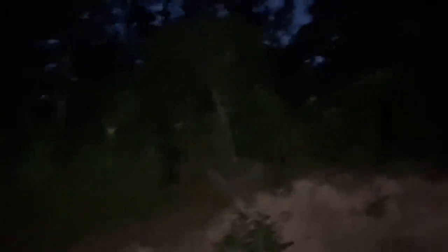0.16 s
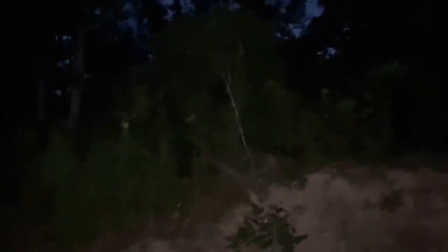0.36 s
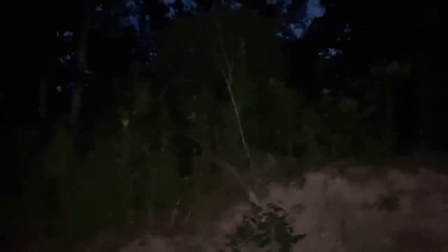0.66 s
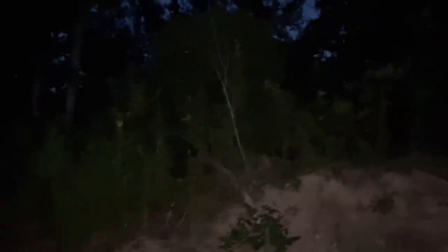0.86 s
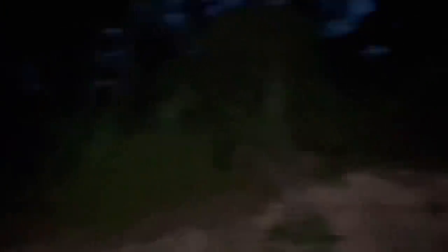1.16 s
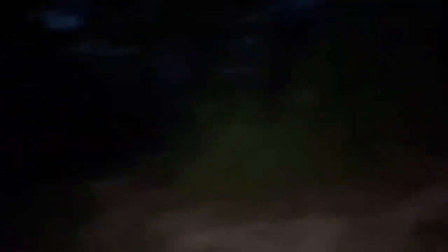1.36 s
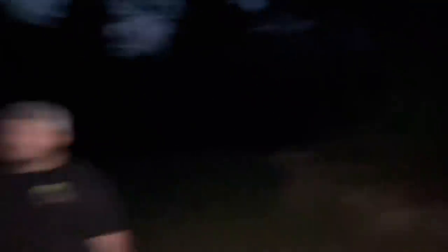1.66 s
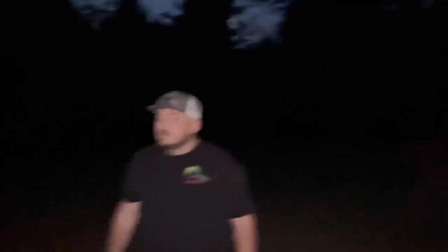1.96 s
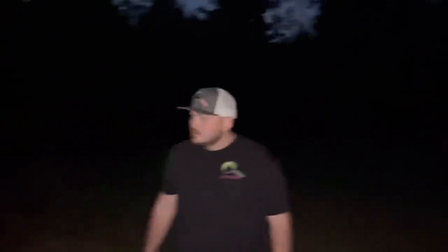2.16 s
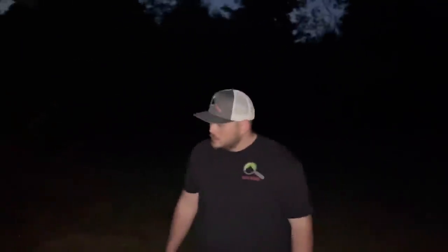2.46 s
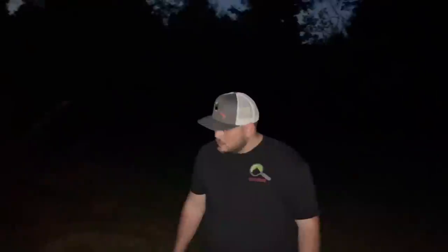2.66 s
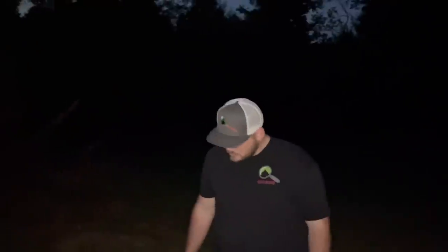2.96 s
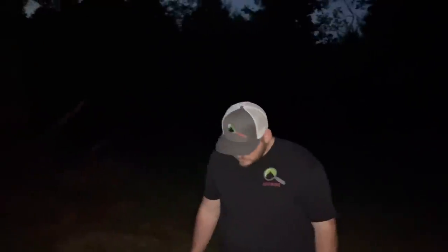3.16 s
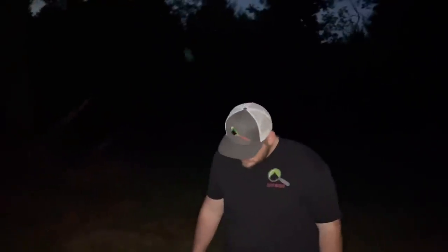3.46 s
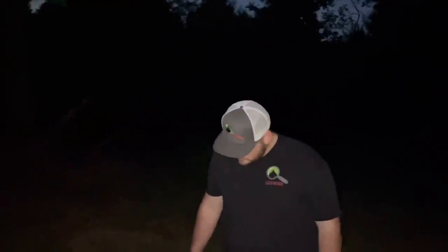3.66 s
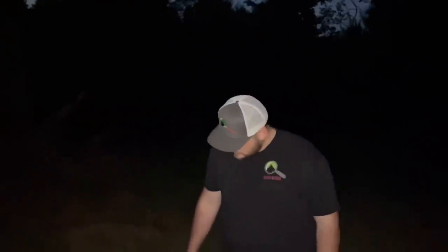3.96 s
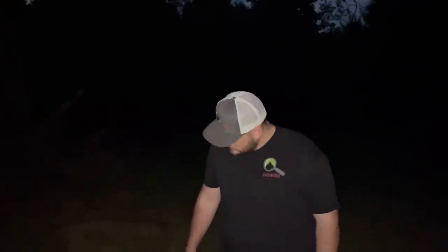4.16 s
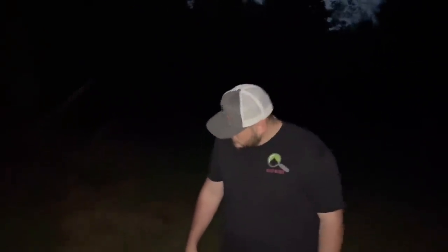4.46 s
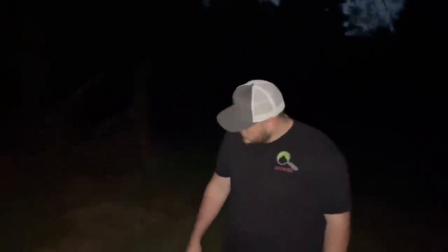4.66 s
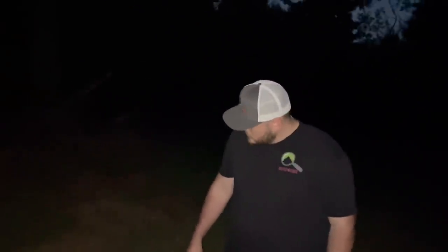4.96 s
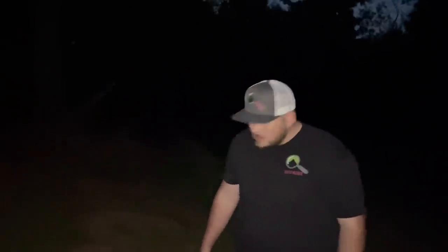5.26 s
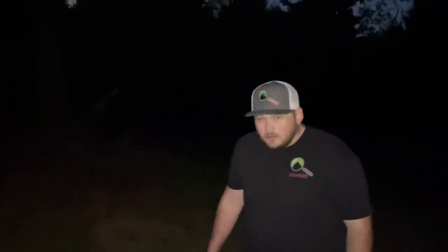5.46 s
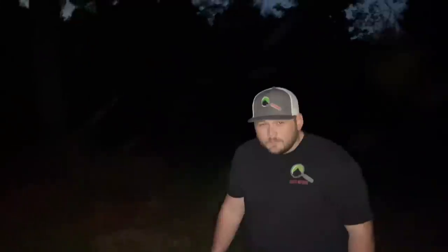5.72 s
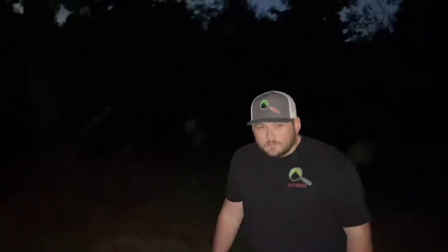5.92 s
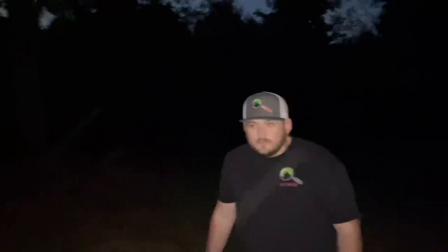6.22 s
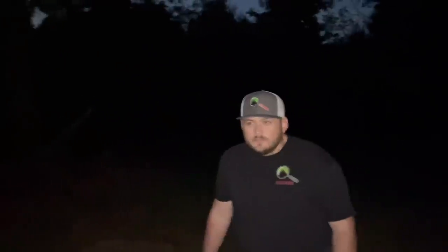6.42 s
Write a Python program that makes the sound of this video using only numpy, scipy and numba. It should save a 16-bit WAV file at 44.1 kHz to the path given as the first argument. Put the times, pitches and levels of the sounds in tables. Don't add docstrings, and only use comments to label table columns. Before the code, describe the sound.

A close katydid buzzes in a steady, very high shimmering whir over massed trilling crickets and faint distant traffic, with a few dry twig ticks.

```python
import sys
import numpy as np
from scipy import signal
from scipy.fft import rfft, irfft, next_fast_len
from scipy.io import wavfile
from scipy.ndimage import uniform_filter1d
from numba import njit

SR = 44100
rng = np.random.default_rng(int(sys.argv[2]) if len(sys.argv) > 2 else 0)


def makeup_ratio(level_db):
    decades = np.asarray(level_db, float) / 20
    return 10 ** decades


def unload_audio(sound):
    columns = np.transpose(np.atleast_2d(sound))
    steps = np.round(np.clip(columns, -1, 1) * 32767)
    wavfile.write(sys.argv[1], SR, steps.astype(np.int16))


N = 290619
T = np.arange(N) / SR
M = next_fast_len(N + SR // 2)
HZ = np.arange(M // 2 + 1) * SR / M


def level(x, db):
    return x * makeup_ratio(db) / np.sqrt(np.mean(x ** 2))


def curve(table):
    s, *columns = np.transpose(table)
    return [np.interp(T, s, c) for c in columns]


def on_hz(table):
    hz, value = np.transpose(table)
    return np.interp(np.log(HZ + 1), np.log(hz + 1), value)


def back(spectrum):
    return irfft(spectrum, M)[..., :N]


def walk(rate):
    k = int(SR / rate)
    held = np.repeat(rng.standard_normal(N // k + 1), k)
    return 1.56 * uniform_filter1d(uniform_filter1d(held, k), k)[:N]


def pan(x, db):
    return x * makeup_ratio(np.array([[db], [-db]]) / 2)


def scatter(x, t60, channels):
    s = np.arange(int(t60 * SR)) / SR
    trail = rng.standard_normal((channels, len(s))) * 1000 ** (-s / t60)
    trail /= np.sqrt(np.sum(trail ** 2, axis=1, keepdims=True))
    return back(rfft(x, M) * rfft(trail, M))


@njit
def glides(rows, bend, skew):
    out = np.zeros(N)
    for start, length, hz0, hz1, size, phase in rows:
        for i in range(max(int(start * SR) + 1, 0), min(int((start + length) * SR), N)):
            u = (i / SR - start) / length
            v = u if skew == 1 else u ** skew
            w = u if bend == 1 else u ** bend
            cycles = length * u * (hz0 + (hz1 - hz0) * w / (1 + bend))
            out[i] += size * 4 * v * (1 - v) * np.sin(phase + 2 * np.pi * cycles)
    return out


def grains(*columns, bend=1., skew=1.):
    rows = np.stack(np.broadcast_arrays(*columns), axis=-1).reshape(-1, 6)
    return glides(rows.astype(float), 1. * bend, 1. * skew)


def turned(s):
    turn_s, turn_length_s = 1.15, .6
    return np.clip((s - turn_s) / turn_length_s, 0, 1)


def air():
    # (frequency [Hz], level per Hz [dB])
    air_colour = [(25, -18.5), (50, -6), (98, 1), (160, -10), (240, -16), (400, -25), (1000, -32.5),
                  (1700, -34), (3300, -32), (6300, -40), (7000, -43), (16000, -45)]
    # (frequency [Hz], share [0-1])
    likeness = [(60, 0.94), (290, 0.9), (640, 0), (1400, 0), (3100, 0.6), (6800, 1)]
    # (frequency [Hz], level [dB])
    lean = [(60, 2.5), (110, 2.5), (200, 4.5), (380, 3), (700, 3.5), (1290, 3), (2380, 10), (4400, 13),
            (8120, 18), (15000, 17)]
    # (time [s], level [dB])
    traffic = [(0, -60), (.2, -60.5), (1.2, -61), (1.4, -59), (2.1, -61.5), (2.85, -59.5), (3.8, -63.5),
               (4.5, -60), (5.45, -60), (5.8, -63.5), (6.3, -59), (6.59, -59)]
    # (start [s], length [s], level over the lull [dB])
    bouts = [
        (.2, 0.79, 7),
        (1.493, 0.52, 5),
        (2.378, 0.47, 8),
        (4.044, 0.88, 6.5),
        (5.643, 1, 4.5),
    ]
    alike = np.clip(on_hz(likeness), 0, 1)
    mid, side = rfft(rng.standard_normal((2, N)), M) * np.sqrt([1 + alike, 1 - alike])
    colour_db = on_hz(air_colour) + np.array([[.5], [-.5]]) * on_hz(lean)
    both = np.array([mid + side, mid - side]) * makeup_ratio(colour_db)
    bouts_db = 0
    for t0, length, db in bouts:
        bouts_db = bouts_db + db * np.clip(np.minimum(T - t0, t0 + length - T) / 0.089, 0, 1)
    bass = 1 / (1 + (HZ / 330) ** 4)
    treble = 1 / (1 + (2200 / (HZ + 1)) ** 6)
    out = 0
    for share, swell_db in zip([1 - bass - treble, treble, bass], [0, bouts_db, *curve(traffic)]):
        stir_db = 1.06 * (swell_db - np.median(swell_db)) + 2.43 * walk(9)
        out = out + back(both * share) * makeup_ratio(stir_db)
    return level(out, -58)


def cricket(starts, hz, rate, size, phase):
    return grains(starts, 0.7 / rate, hz * 1.012, hz * .99, size, phase)


def crowds():
    # (pitch [Hz], pitch spread [Hz], pulse rate [1/s], level [dB], left minus right [dB])
    far_crowds = [
        (2458, 119, 55, -63.5, 1),
        (2081, 171.7, 45, -72.5, 2.5),
        (4225, 111.7, 40, -59.5, 4),
        (5259, 149.4, 50, -59, 6.5),
        (6107, 200, 38, -74.5, -4.5),
    ]
    out = 0
    for hz, spread_hz, rate, db, lean_db in far_crowds:
        pitch = np.linspace(-1.2, 1.2, num=10)[:, None]
        pace = rng.standard_normal((10, 1))
        late, size, drift, phase = rng.standard_normal((4, 10, 420))
        starts = np.cumsum(1 + .05 * late, axis=1) / (rate * (1 + .08 * pace)) - .1
        fading = makeup_ratio(7.3 * uniform_filter1d(size, size=12, axis=1))
        pitches_hz = hz + spread_hz * (.8 * pitch + 0.4 * drift + 0.1382 * drift ** 3)
        crowd = cricket(starts, pitches_hz, rate, fading, 3 * phase)
        heard = crowd + scatter(crowd, .3, channels=2)
        out = out + pan(level(heard, db), lean_db)
    return out


def phrase_singers():
    # (start [s], end [s], level [dB])
    soloists = [
        (4290, 35, 3.4, [(.48, .86, -59), (1.26, 1.66, -57.5), (1.84, 2.1, -61.5), (3.6, 3.98, -61.5), (4.25, 4.64, -64), (5.68, 5.99, -58.5), (6.25, 6.55, -61.5)]),
        (4535, 30.5, 5.8, [(1.8, 2., -65), (2.07, 2.31, -62.5), (2.45, 2.63, -65), (6.3, 6.5, -69)]),
        (6400, 10, 14, [(.28, .46, -78), (.7, .91, -79), (2.05, 2.26, -70)]),
        (5700, 16, 2, [(.05, .3, -76), (.42, .6, -75), (.9, 1.1, -73), (3.7, 4., -76)]),
        (2223, 37, 1.5, [(0, 7.2, -93)]),
    ]
    # first phrase at 2.11 s, one every 0.632 s, each 0.21 s long
    steady = [(t0, t0 + .21, -63.5) for t0 in 2.11 + .632 * np.arange(7)]
    out = 0
    for hz, rate, lean_db, phrases in soloists + [(5320, 23, 15, steady)]:
        starts = [np.arange(t0, t1 - .7 / rate, 1 / rate) for t0, t1, db in phrases]
        sizes = np.repeat([makeup_ratio(db + 7.0) for t0, t1, db in phrases], [len(s) for s in starts])
        starts = np.concatenate(starts)
        slip, size = rng.standard_normal((400, 2))[:len(starts)].T
        phase = 2 * np.pi * hz * starts + 0.99 * slip
        out = out + pan(cricket(starts, hz, rate, sizes * makeup_ratio(2.1 * size), phase), lean_db)
    return out


def paired_singer():
    starts = 0.0066 + np.arange(84) / 12.75 + np.array([[0], [.026]])
    sizes = makeup_ratio(-61 - 5.5 * turned(starts))
    return pan(cricket(starts, 6310, 60, sizes, 3 * rng.standard_normal(starts.shape)), 2.6)


def singers():
    out = phrase_singers() + paired_singer()
    return out + makeup_ratio(-15.5) * scatter(out, .2, channels=2)


def rubbing(rows):
    out = np.zeros((2, N))
    for t0, length, db, low_hz, high_hz in rows:
        i, n = int(t0 * SR), int(length * SR)
        rub = rng.standard_normal((2, SR))[:, :n] * makeup_ratio(4.9 * walk(146)[:n])
        sos = signal.butter(2, [low_hz, high_hz], "band", fs=SR, output="sos")
        band = signal.sosfilt(sos, rub)
        out[:, i:i + n] += level(band, db) * signal.windows.tukey(n, .5)
    return out


def breeze():
    # (start [s], length [s], level [dB])
    puffs = [
        (1.26, .22, -66),
        (2.18, .13, -68),
        (2.76, .17, -70),
        (4.55, .25, -73),
        (6.22, .22, -70),
    ]
    return rubbing([(*puff, 150, 330) for puff in puffs])


def cloth():
    # (start [s], length [s], level [dB], low edge [Hz], high edge [Hz])
    rustles = [
        (0.027, 0.062, -55.5, 600, 5200),
        (0.215, 0.047, -53, 3070, 9250),
        (1.908, 0.29, -68.5, 395, 1990),
        (4.45, 0.45, -68.5, 387, 2000),
        (5.297, 0.49, -78.5, 400, 1490),
    ]
    return rubbing(rustles)


def twig_ticks():
    # (time [s], peak level [dB], left minus right [dB], start pitch [Hz], length [ms])
    twigs = [
        (1.869, -40, 1, 3800, 5.8),
        (1.895, -50, 4, 1990, 5.5),
        (1.957, -55, 2, 2560, 2.2),
        (1.995, -58, 5, 2010, 2.8),
        (2.034, -63, 2, 1210, 6.7),
        (2.125, -60.5, 4, 2000, 3.2),
        (3.889, -58.5, 6, 3080, 2.3),
        (4.763, -54.5, 12, 1340, 4.7),
        (5.913, -54.5, 5, 2560, 5.5),
        (6.03, -52.5, 2.5, 1390, 3.2),
    ]
    out = 0
    for t0, db, lean_db, hz0, ms in twigs:
        out = out + pan(grains(t0, ms / 1000, hz0, 414, makeup_ratio(db), 0, bend=0.596), lean_db)
    cracks = [(twig[0], .006, twig[1] - 9, 220, 4500) for twig in twigs]
    return out + rubbing(cracks)


def dry_snaps():
    # (time [s], peak level [dB], centre [Hz])
    snaps = [
        (3.89, -46, 4030),
        (4.069, -42, 5430),
        (4.814, -45, 6000),
        (4.84, -54, 7500),
        (4.879, -47, 7000),
    ]
    out = 0
    for t0, db, hz in snaps:
        out = out + pan(grains(t0, 1.64 / hz, 1.2 * hz, 0.73 * hz, makeup_ratio(db), 0), 7.3)
    return out


def small_noises():
    out = breeze() + cloth() + twig_ticks() + dry_snaps()
    return out + makeup_ratio(-15) * scatter(out, .08, channels=2)


def wing_strokes():
    # (time [s], stroke pairs per second [1/s])
    wing_pace = [(0, 62.093), (1.5, 61.978), (2.1, 62.143), (2.9, 62.01), (3.5, 62.486), (4.9, 62.135),
                 (5.1, 62.319), (5.9, 62.12)]
    # (place in the pair [0-1], level [dB], first pitch [Hz], last pitch [Hz],
    # length [ms], lead [ms], bend of the fall [power], lateness of the peak [power])
    strokes = [
        (.52, -3, 16150, 10430, 2.4, 1.45, 1.547, 0.69),
        (.985, -5, 14890, 10520, 3.2, 2.4, 3.6, 2),
    ]
    s, pace = np.transpose(wing_pace)
    s = np.append(s, N / SR)
    done = .248 + np.append(0, np.cumsum(pace * np.diff(s)))
    pair = np.arange(int(done[-1]))
    hand_db, hand_rest_db, hand_first_ms, hand_last_ms = -4, -20, .325, .215
    near = 0
    for place, db, hz0, hz1, ms, lead_ms, bend, skew in strokes:
        late, size, pitch, phase = rng.standard_normal((len(pair), 4)).T
        start = np.interp(pair + place, done, s) + (.1 * late - lead_ms) / 1000
        lag_ms = hand_first_ms + (hand_last_ms - hand_first_ms) * turned(start)
        swell = np.sqrt(np.abs(np.sin(np.pi * turned(start))))
        bounce_db = hand_rest_db + (hand_db - hand_rest_db) * swell
        starts = np.array([start, start + lag_ms / 1000, start + 0.00091])
        sizes = makeup_ratio(db + 0.75 * size + np.array([0 * start, bounce_db, 0 * start - 12]))
        chirps = grains(starts, ms / 1000, hz0 + 150 * pitch, hz1, sizes, 3 * phase, bend=bend, skew=skew)
        near = near + chirps
    return near


def katydid():
    # (frequency [Hz], level [dB])
    wing = [(7400, -30.5), (8000, -7.5), (8800, -7), (9900, -23), (11200, -16), (11750, -18.5),
            (12500, -5.5), (13450, -3.5), (13900, -6.5), (14550, -1), (15200, -12.5), (15700, -13),
            (16300, -34)]
    # (time [s], level [dB])
    buzz = [(0.0, -43), (0.02, -46), (0.22, -43.5), (1.03, -44), (1.38, -43), (1.54, -45.5), (1.67, -42),
            (3.41, -44), (4.0, -43), (5.19, -44.5), (5.95, -43.5), (6.59, -43.5)]
    near = wing_strokes()
    whole = rfft(near + makeup_ratio(-6.5) * scatter(near, 0.096, channels=1)[0], M)
    whole = whole / np.sqrt(uniform_filter1d(np.abs(whole) ** 2, size=1600) + 1e-9)
    far = rfft(rng.standard_normal((2, N)), M) / np.sqrt(N)
    far_db = on_hz([(8000, 4.0), (11000, -0.5), (12500, -9.5), (14700, -6.5), (16000, -1.5)])
    colour = (whole + makeup_ratio(far_db) * far) * makeup_ratio(on_hz(wing))
    loud_db = curve(buzz)[0]
    top_db, low_db = 2 * turned(T), -14.5 + 3 * turned(T)
    top = np.clip((HZ - 13600) / 900, 0, 1)
    low = np.clip((10200 - HZ) / 700, 0, 1)
    body = back(colour * (1 - top) * (1 - low))
    body = body + makeup_ratio(top_db - np.mean(top_db)) * back(colour * top)
    steadiness = np.sqrt(uniform_filter1d(body ** 2, size=SR // 4))
    return makeup_ratio(loud_db) * (body + makeup_ratio(low_db) * back(colour * low)) / steadiness


def scene():
    return air() + crowds() + singers() + small_noises() + katydid()


def top_cut(x):
    return signal.sosfilt(signal.butter(12, 16370, fs=SR, output="sos"), x)


def record(dry):
    # (frequency [Hz], phase [radians])
    lead = [(0, 0), (2500, .6), (5500, .9), (6800, -3.14), (9900, -3.25), (10400, -4.2), (11300, -5.),
            (12500, -5.75), (13500, -6.283), (22050, -6.283)]
    left, right = rfft(dry * signal.windows.tukey(N, .002), M) * (HZ < 15830)
    shared = on_hz([(6500, 0), (7500, 0.6), (9000, 0.8), (12500, 0.95), (13500, 0.84)])
    right = (1 - shared) * right + shared * left
    turn = np.exp(.5j * np.interp(HZ, *np.transpose(lead)))
    return top_cut(back(np.array([left * turn, right / turn])))


dry = scene()
out = record(dry)
unload_audio(out)
```